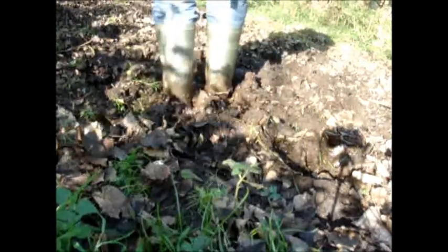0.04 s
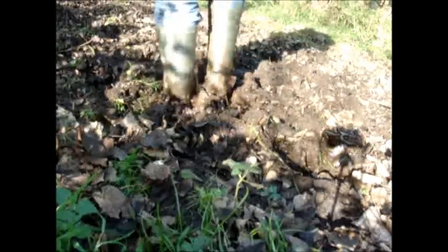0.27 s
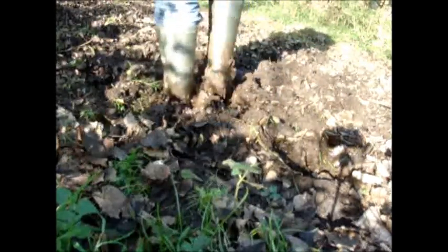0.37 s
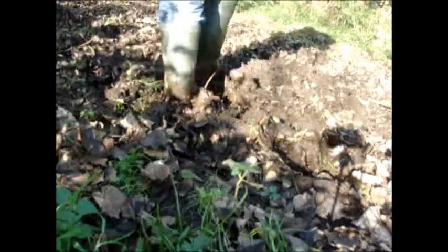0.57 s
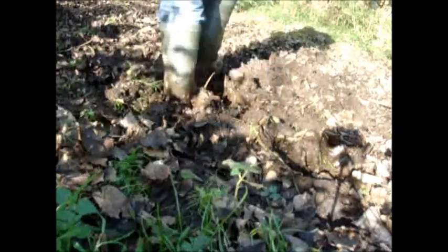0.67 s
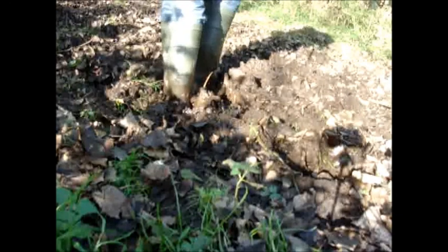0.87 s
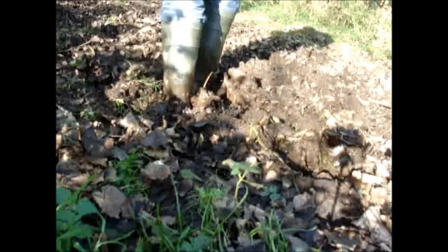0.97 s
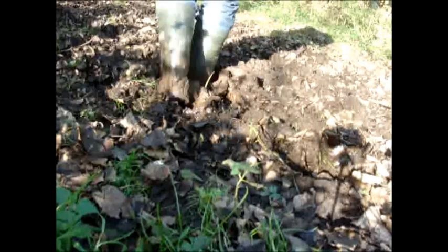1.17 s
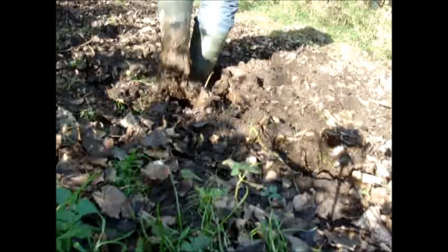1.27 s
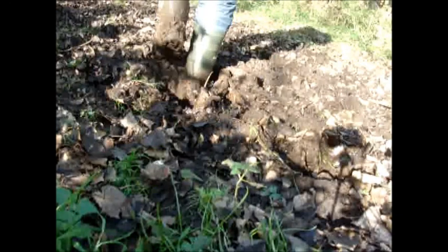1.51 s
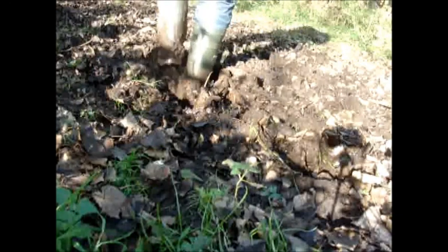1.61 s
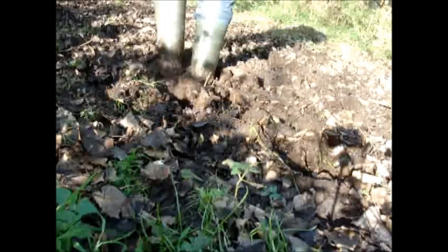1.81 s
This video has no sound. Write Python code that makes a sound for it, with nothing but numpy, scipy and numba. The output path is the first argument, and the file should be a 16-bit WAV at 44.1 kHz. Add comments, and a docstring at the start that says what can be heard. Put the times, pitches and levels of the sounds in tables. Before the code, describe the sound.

A rubber boot squelches and pops out of soft mud, then the other peels free.

```python
"""A low, steady wind rumbles while two rubber boots brush over wet soil and pull out of soft mud.
The first seal breaks at once: a spray of tearing mud, a volley of air pockets, a gulp as air fills the hole.
The freed boot swishes past wet leaves, then the second peels out slowly with small pops and squelches.
Thin wet films tick as the feet move, and the rough ground scatters a brief echo."""
import sys
import numpy as np
from scipy import signal
from scipy.fft import rfft, irfft, next_fast_len
from scipy.io import wavfile
from numba import njit

SR = 44100
rng = np.random.default_rng(int(sys.argv[2]) if len(sys.argv) > 2 else 0)


def master(y):
    """Save y as 16-bit WAV."""
    cut = np.clip(np.atleast_2d(y).T, -1, 1)
    pcm = np.round(cut * 32767)  # scale
    wavfile.write(sys.argv[1], SR, pcm.astype(np.int16))


N = 81585


def undb(db):
    """Decibels to gain."""
    return 10 ** (np.asarray(db) / 20)


def unit(x):
    """Scale to rms 1."""
    return x / np.sqrt(np.mean(x ** 2))


def since(start):
    """Seconds since a moment, zero before it."""
    return np.maximum(np.arange(N) / SR - start, 0)


def fader(points):
    """Gain over time from (time, level) points."""
    return undb(np.interp(since(0), *np.array(points).T))


def equalise(x, points):
    """Minimum-phase EQ through (frequency, gain) points; rms 1."""
    hz, db = np.array(points).T
    size = next_fast_len(N) * 2
    bins_hz = np.maximum(np.fft.rfftfreq(size, 1 / SR), 1)
    gain = undb(np.interp(np.log(bins_hz), np.log(hz), db))
    cepstrum = irfft(np.log(gain))
    cepstrum[1:size // 2] *= 2  # folded so that nothing rings ahead of a click
    cepstrum[size // 2 + 1:] = 0
    return unit(irfft(rfft(x, size) * np.exp(rfft(cepstrum)))[:N])


def clicks(per_s, spread_db):
    """Random tiny ruptures of uneven size."""
    hits = rng.random(N) < per_s / SR
    polarity = np.sign(rng.standard_normal(N))
    return hits * polarity * undb(spread_db * np.clip(rng.standard_normal(N), -2, 2))


def bubbles(per_s, spread_db, bands=30):
    """Tiny bubbles of random pitch, each ringing for a few cycles."""
    out = 0
    for hz in np.geomspace(300, 9500, bands):
        ruptures = unit(clicks(per_s / bands, spread_db))
        out += signal.lfilter(*signal.iirpeak(hz, Q=3.35, fs=SR), ruptures)
    return out


def hiss(hz, width):
    """Noise sent twice through a resonance whose bandwidth is width * hz; rms 1."""
    b, a = signal.iirpeak(hz, 1 / width, fs=SR)
    return unit(signal.lfilter(b, a, signal.lfilter(b, a, rng.standard_normal(N))))


# Dark tone of the wind (frequency [Hz], gain [dB])
WIND_EQ = [(15, -19), (25, -6), (75, -1.5), (137, -2), (245, -4), (414, -8), (1150, -6), (1530, -10.5),
           (3320, -22.5), (5620, -24), (10000, -29), (13000, -86), (22000, -120)]

def wind():
    """Wind lays a steady bed of low rumble."""
    return undb(-43.5) * equalise(rng.standard_normal(N), WIND_EQ)


# Swells of the boots brushing the ground (time [s], level [dB])
BRUSH_FADER = [(0, -49.5), (.06, -50.5), (.2, -49.5), (.34, -49), (.44, -48), (.62, -48.5), (.72, -54),
               (.86, -45), (.97, -47), (1.10, -55), (1.18, -60), (1.26, -43), (1.42, -56), (1.57, -46),
               (1.70, -46.5), (1.79, -41.5), (1.85, -48)]
# Bright tone of the brushing (frequency [Hz], gain [dB])
BRUSH_EQ = [(800, -20), (2000, -5), (3500, -1), (5800, -1.5), (7500, -3), (10000, -5.5)]

def brush():
    """Boots brush over wet soil and leaves with a fine, grainy fizz."""
    return fader(BRUSH_FADER) * equalise(bubbles(per_s=11000, spread_db=13), BRUSH_EQ)


# Wet films snapping (time [s], centre [Hz], level [dB])
FILM_SNAPS = [(0.0616, 5660, -34), (0.3691, 5760, -31.5), (0.515, 5200, -30.5), (0.8908, 2520, -34.5),
              (0.923, 4760, -27), (1.0606, 4660, -24.5), (1.1100, 5230, -27), (1.156, 3930, -28.5),
              (1.363, 3800, -33), (1.6742, 4240, -28.5), (1.7340, 3780, -32.5)]

def film_ticks(decay_s=0.0042):
    """Thin wet films snap, each a short, bright burst of noise."""
    out = 0
    for start, hz, db in FILM_SNAPS:
        t = since(start)
        out += undb(db) * hiss(hz, width=0.69) * (t > 0) * np.exp(-t / decay_s)
    return out


# Jagged tone of tearing mud (frequency [Hz], gain [dB])
TEAR_EQ = [(120, -19), (500, -3.5), (950, 1), (1200, -8), (1650, 6.5), (1800, -2.5), (2070, 1), (2250, -18),
           (2900, 1.5), (3200, -6), (3480, -12), (4270, -0.5), (5000, -12), (6200, -11), (8300, -15.5),
           (9500, -8.5), (10200, -33)]

def seal_tear(attack_s=0.0056, release_after_s=0.033, release_s=0.017):
    """The first boot's seal rips in a dense spray of ruptures."""
    t = since(0.246)
    attack = np.minimum(t / attack_s, 1)
    release = np.clip(1 - (t - release_after_s) / release_s, 0, 1) ** 2.08
    spray = equalise(clicks(per_s=9000, spread_db=4.5), TEAR_EQ)
    return undb(-11.5) * attack * release * spray


def cavity(start, hz, swell_ms, rise_per_swell=0.028, wobble_depth=0.1, wobble_s=0.0003):
    """An opening air cavity swells, climbs in pitch and dies fast; its soft walls make the note waver."""
    t = since(start)
    age = t / (swell_ms / 1000)  # loudest at 1
    wobble = unit(signal.lfilter([1], [1, -np.exp(-1 / (wobble_s * SR))], rng.standard_normal(N)))
    pitch_hz = hz * (1 + rise_per_swell * age + wobble_depth * wobble)
    cycles = np.cumsum((t > 0) * pitch_hz) / SR
    envelope = (age * np.exp(1 - age)) ** 2
    return envelope * np.sin(2 * np.pi * cycles)


# Air pockets bursting (time [s], pitch [Hz], swell [ms], ring level [dB], crack level [dB])
POCKET_POPS = [(.2470, 1220, 1.6, -6.5, -3), (0.253, 1450, 1.8, -6, -8.5), (0.2552, 2900, 1.1, -3.5, -27),
               (0.2594, 1500, 1.5, -5, -36), (0.2621, 1154, 1.37, -2, -10), (.2668, 1060, 1.7, -12, -10),
               (0.2690, 528, 1.3, -1, -24), (0.276, 1470, 1.5, -9.5, -22), (.2895, 2600, 1.4, -18, -36),
               (0.3071, 1265, 1.2, -12, -52), (0.3268, 526, 1.15, -20, -40),
               (0.8905, 2200, 0.8, -24.5, -42), (1.0493, 860, 0.93, -22, -38),
               (1.0615, 4560, 1.3, -19, -36), (1.063, 1270, 1.8, -26, -41),
               (1.0837, 1120, 0.78, -26.5, -26), (1.0888, 2230, 0.9, -24, -36),
               (1.1409, 1060, 0.87, -20, -45), (1.143, 1485, 1.15, -21, -40),
               (1.1448, 2280, 0.74, -21.5, -47), (1.1560, 2420, 0.88, -21.5, -43),
               (1.1569, 451, 3.1, -25.5, -61), (1.1675, 990, 1.1, -28.5, -40),
               (1.2035, 1310, 1.7, -23, -36), (1.2786, 1480, 0.51, -17.5, -40),
               (1.2852, 525, 1.3, -31, -26.5)]
# Tone of a pocket's wall cracking (frequency [Hz], gain [dB])
CRACK_EQ = [(150, -33.5), (600, -4.5), (1300, 5), (2300, -8.5), (3000, 7.5), (3600, -18), (4300, -9),
            (6200, 1), (8000, -14), (10000, -18)]

def air_pockets(crack_decay_s=0.0029, overtone_ratio=1.9, overtone_db=-12.5):
    """Each pocket cracks its wall and rings with a main note and a shorter overtone."""
    crackle = equalise(clicks(per_s=9000, spread_db=1.0), CRACK_EQ)
    out = 0
    for start, hz, swell_ms, ring_db, crack_db in POCKET_POPS:
        t = since(start)
        ring = cavity(start, hz, swell_ms)
        ring += undb(overtone_db) * cavity(start, hz * overtone_ratio, swell_ms * 0.76)
        crack = crackle * (t > 0) * np.exp(-t / crack_decay_s)
        out += undb(ring_db) * ring + undb(crack_db) * crack
    return out


# Air filling the holes (time [s], pitch [Hz], swell [ms], level [dB])
AIR_GULPS = [(.2630, 330, 5.4, -20), (.2700, 180, 2.76, -18), (0.2787, 442, 1.7, -13),
             (.3050, 470, 1.6, -23.5), (1.1570, 830, 0.38, -31)]

def gulps():
    """Air rushes into the hole under a boot and rings it with short, hollow notes."""
    return sum(undb(db) * cavity(start, hz, swell_ms) for start, hz, swell_ms, db in AIR_GULPS)


# Swells of the mud's crackle (time [s], level [dB])
SQUELCH_FADER = [(.295, -62), (.301, -50), (.308, -32.5), (.333, -31), (.35, -35), (.385, -43.5),
                 (.44, -52), (.98, -102), (1.015, -41.5), (1.035, -33), (1.057, -38), (1.066, -30.5),
                 (1.078, -42), (1.092, -33), (1.125, -44.5), (1.157, -32.5), (1.185, -41.5), (1.230, -36),
                 (1.262, -39), (1.30, -49), (1.42, -60)]
# Thick tone of wet mud (frequency [Hz], gain [dB])
SQUELCH_EQ = [(100, -4), (280, 3), (500, -3), (850, 1), (1300, -2), (1900, -2.5), (2500, -0.5),
              (3200, -6.5), (4200, -3), (6000, -12), (10000, -11)]

def squelch(burst_s=0.0055, burst_spread_db=3):
    """Mud crackles in bursts and lulls as it settles or peels from the rubber."""
    strength_db = burst_spread_db * np.clip(rng.standard_normal(N), -2, 1)
    bursts = unit(undb(np.interp(since(0) / burst_s, np.arange(N), strength_db)))
    crackle = equalise(bubbles(per_s=5600, spread_db=5), SQUELCH_EQ)
    return fader(SQUELCH_FADER) * bursts * crackle


def leaf_swish(peak_s=0.802, spread_s=0.033):
    """The freed boot swings past wet leaves: a smooth hiss that swells and fades."""
    swell = np.exp(-((since(0) - peak_s) / spread_s) ** 2 / 2)
    return undb(-41.5) * swell * hiss(hz=6170, width=0.54)


def ground_scatter(sound, decay_s=0.0043):
    """Rough ground throws back a very short, diffuse echo."""
    echo = rng.standard_normal(N) * np.exp(-since(0) / decay_s)
    return undb(-11.5) * signal.fftconvolve(sound, echo / np.linalg.norm(echo))[:N]


def scene():
    """The wind bed, the boots in the mud and their echo, mixed in mono."""
    boots = brush() + film_ticks() + seal_tear() + air_pockets() + gulps() + squelch() + leaf_swish()
    return (wind() + boots + ground_scatter(boots))[None]


@njit
def follow(x, attack_s, release_s):
    """Envelope follower with separate rise and fall times."""
    out, level = np.empty(len(x)), 0.
    for i in range(len(x)):
        lag_s = attack_s if abs(x[i]) > level else release_s
        level += (abs(x[i]) - level) / (lag_s * SR)
        out[i] = level
    return out


def record(dry, threshold_db=-17, ratio=1.53, low_cut_hz=42, clip_db=-1.0):
    """A gentle compressor and a low cut, then two stages that each clip any top peaks and cut the highs."""
    level = follow(dry[0], attack_s=0.0065, release_s=0.017)
    gain = np.maximum(level / undb(threshold_db), 1) ** (1 / ratio - 1)
    sound = signal.lfilter(*signal.butter(2, low_cut_hz, "high", fs=SR), dry * gain)
    for top_hz in (10000, 15500):
        high_cut = signal.ellip(10, .2, 85, top_hz, fs=SR, output="sos")
        sound = signal.sosfilt(high_cut, np.clip(sound, -undb(clip_db), undb(clip_db)))
    return sound


dry = scene()
out = record(dry)
master(out)
```